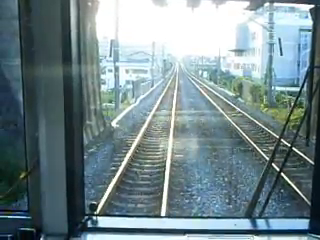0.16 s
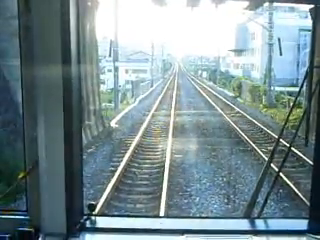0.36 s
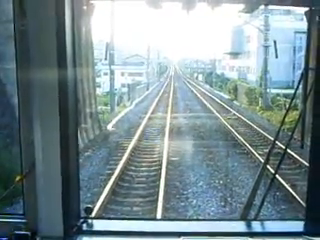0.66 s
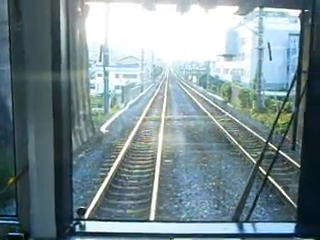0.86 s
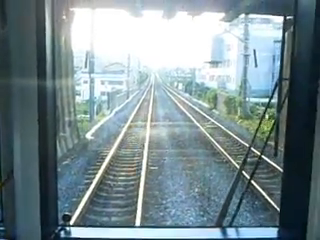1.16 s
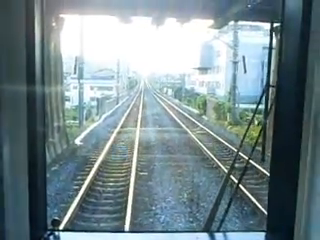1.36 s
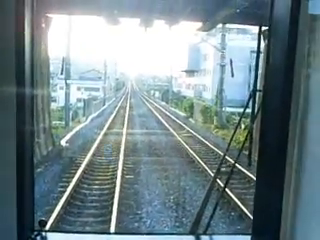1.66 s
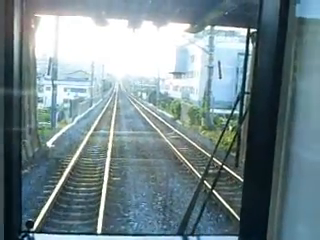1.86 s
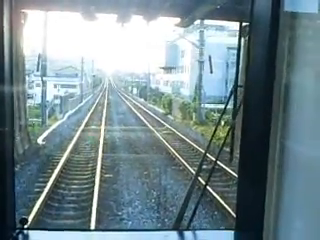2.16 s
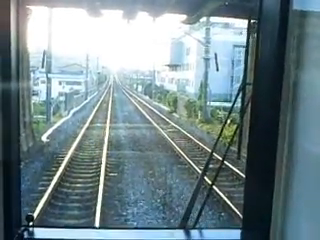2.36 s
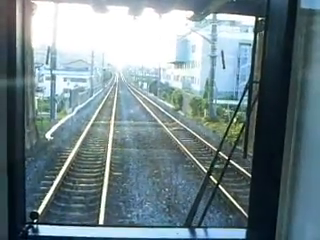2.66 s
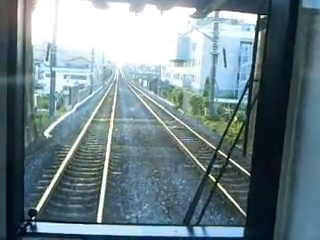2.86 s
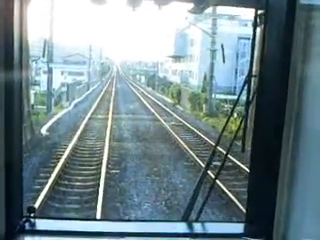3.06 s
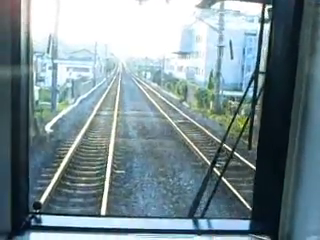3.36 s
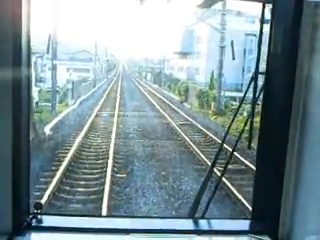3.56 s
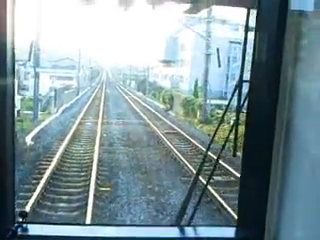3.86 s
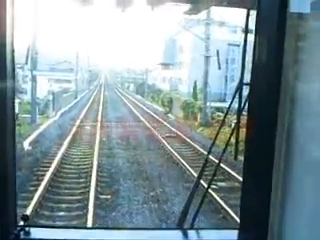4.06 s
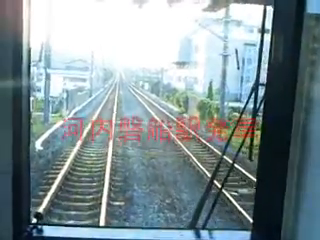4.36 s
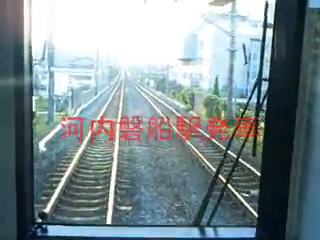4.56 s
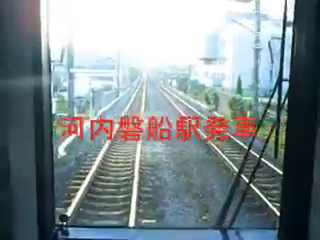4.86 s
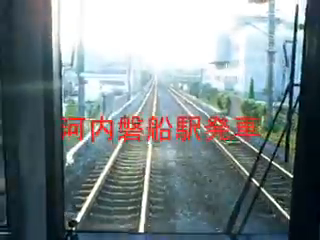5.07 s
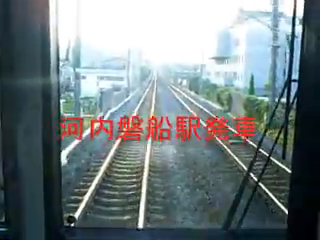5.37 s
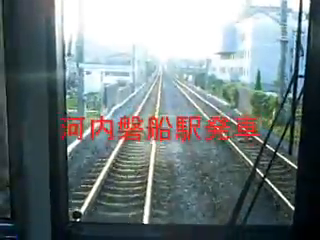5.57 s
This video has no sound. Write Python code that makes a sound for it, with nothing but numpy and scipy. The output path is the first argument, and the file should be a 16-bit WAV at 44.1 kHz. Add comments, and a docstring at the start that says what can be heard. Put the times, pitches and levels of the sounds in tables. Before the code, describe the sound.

Muffled low rumble and steady electrical hum inside a train cab, with an early knock and air puff, dull jolts and faint squeaks.

```python
"""In the cab of an electric train pulling away from a station, the car body rumbles and jolts over the track.
Shaped noise gives the rumble and the rush of the gears; struck modes give the jolts, and sines the electrical hum.
An air-driven switch knocks and puffs in bursts of noise as power comes on.
Wheels squeak faintly on unsteady notes and fittings rustle; a small camera crackles with overload at some jolts
and holds its samples, adding a thin fizz."""
import sys
import numpy as np
from scipy import signal
from scipy.fft import rfft, irfft, next_fast_len
from scipy.io import wavfile
from scipy.ndimage import uniform_filter1d, map_coordinates

SR = 44100
rng = np.random.default_rng(int(sys.argv[2]) if len(sys.argv) > 2 else 0)


def wav_out(sig):
    """Save sig, one row per channel (or a flat mono array), as 16-bit PCM at SR to the path in sys.argv[1]."""
    wavfile.write(sys.argv[1], SR, np.round(np.clip(np.atleast_2d(sig).T, -1, 1) * 32767).astype(np.int16))


N = 252693
TIME = np.arange(N) / SR
# the train accelerates evenly: speed as a share of the last speed
SPEED = TIME / TIME[-1]

# Noise spectra, only their shape counting: (frequency [Hz], relative density [dB per Hz])
# gears and bearings: dull rush and thin whirr
RUSH_SPECTRUM = [(400, -4.5), (600, -4), (750, -3), (880, -0.5), (1000, -4.5), (1300, -16.5)]
WHIRR_SPECTRUM = [(900, -12), (1200, -1.5), (1500, -3), (1750, -8), (2050, -14), (2700, -7), (3600, -19),
                  (5500, -13.5)]
# loose panels, duller and brighter
DULL_RUSTLE_SPECTRUM = [(700, -21.5), (1200, -12), (1600, 17), (2100, -8.5), (2700, -2.5), (5500, -35.5)]
BRIGHT_RUSTLE_SPECTRUM = [(1500, -18), (2300, -6.5), (2700, 1.5), (3500, -24.5), (5500, -37)]
# air switch: knock, puff of air and sharp top of the jet
KNOCK_SPECTRUM = [(30, 3), (70, 0), (105, 12.5), (190, 7.5), (260, 3), (450, -1.5), (800, -19), (1300, 10),
                  (1650, 0), (2100, -35), (2700, -18), (4000, -24), (5800, -19)]
PUFF_SPECTRUM = [(120, 8.5), (400, -4.5), (800, 0.5), (1500, 1), (2100, -12), (2650, 2), (3300, -18.5),
                 (4500, -12), (5800, -31)]
HISS_SPECTRUM = [(2200, -14.5), (2650, -12), (3300, 4), (3800, 1), (4600, 2.5), (5800, -4)]
# car: swaying body, shudder, drumming floor and rolling wheels
SWAY_SPECTRUM = [(10, -5.5), (16, 4.5), (29, 5.5), (38, 0.5), (44, -10.5)]
SHUDDER_SPECTRUM = [(40, -8), (46, -1), (49, -1), (54, 1), (64, -25.5)]
BOOM_SPECTRUM = [(58, -11), (68, -3), (80, 5.5), (95, -4.5), (110, -10), (140, -19)]
ROLL_SPECTRUM = [(105, -22), (135, 1.5), (170, 0), (210, -2), (270, -2.5), (350, -5.5), (410, -14.5),
                 (500, -19.5), (700, -23)]
# crackle of overload at a bump
CRACKLE_SPECTRUM = [(400, -0.5), (800, 7), (1080, 9.5), (1500, -13), (2200, -3.5), (3500, -8),
                    (5500, -10.5)]

# level of the thin whirr: (time [s], level [dB])
WHIRR_LEVEL = [(0, -39), (0.7, -44.5), (2.2, -44.5), (2.9, -46.5), (4.5, -47.5), (5.3, -46.5), (5.73, -44)]
# loose cab fittings: (time [s], level [dB], decay by 60 dB [s], brightness [0-1])
FITTING_RUSTLES = [(0.91, -42, 0.58, 0.22), (1.2, -37, 0.92, 0.58), (1.6, -44, 0.7, 0),
                   (2.56, -37.5, 0.56, 0.7), (2.65, -41, 0.4, 1), (3.185, -36.5, 0.5, 0.2),
                   (3.45, -43, 0.4, 0.5), (4.15, -31, 0.22, 0.42)]
# squeaks and groans of the wheels: (middle [s], length [s], frequency [Hz], rms level at the middle [dB])
WHEEL_SQUEAKS = [(0.033, 0.12, 1394, -46), (0.67, 0.13, 835, -40), (1.558, 0.42, 314.8, -39),
                 (1.88, 0.14, 1470, -48.5), (2.095, 0.34, 1423, -45.5), (2.468, 0.27, 1424, -47),
                 (3.91, 0.082, 660, -44), (4.312, 0.13, 368.4, -38), (4.967, 0.3, 1497, -51),
                 (5.31, 0.18, 1460, -46), (5.585, 0.08, 683, -40)]
# steady tones of the electrical gear: (frequency [Hz], central rms level [dB], waver [dB])
GEAR_TONES = [(121.05, -37, 0.5), (175.14, -40, 3.5), (235.2, -43.5, 1), (466.3, -54.5, 5),
              (546.9, -33.5, 0.63), (665.5, -54.5, 4), (1260, -61, 5.5), (1558, -62, 1)]
# drone of the traction motors: (time [s], frequency [Hz], central rms level [dB])
MOTOR_DRONE = [(0, 97, -46), (1.9, 98, -36.5), (2.3, 98.5, -33.5), (3.3, 98, -33.5), (3.8, 97.3, -29.5),
               (5.73, 98.17, -26.5)]
# lurches of the car: (time [s], hold [s], sway level [dB], shudder level [dB])
CAR_LURCHES = [(0.043, 0.15, -10, -17.5), (0.715, 0.22, -7, -11.5), (1.055, 0.11, -3.5, -17),
               (1.246, .2, -12.5, -14), (1.645, 0.38, -33, -13.5), (2.197, 0.14, -11, -30),
               (2.923, 0.17, -20, -22.5), (3.308, 0.54, -13.5, -26), (3.963, 0.21, -13, -37),
               (4.794, 0.072, -6.5, -22), (5.15, 0.34, -16.5, -28)]
# wheels rolling over rougher and smoother rail: (time [s], level [dB])
ROLL_LEVEL = [(0, -28.5), (.6, -31.5), (1.3, -31), (2.1, -33), (2.55, -34), (3.2, -33.5), (4.3, -32),
              (5.73, -30)]
# bumps: (time [s], strength before the mode's share [dB], hardness [Hz], overload crackle level [dB])
BUMPS = [(0.11, -23, 260, -60), (0.75, -18, 110, -50), (0.805, -11, 85, -14), (0.9, -14, 45, -36),
         (0.952, -15, 45, -28), (1.182, -12, 40, -21), (1.43, -23, 400, -50), (1.453, -20, 450, -33),
         (3.39, -14, 45, -60), (4.845, -21, 60, -60)]
# modes of the car body: (frequency [Hz], relative level [dB], decay by 60 dB [s])
BODY_MODES = [(34.8, -21, 0.53), (52.7, 2, 0.53), (80.4, 7, 0.19), (119, -11.5, 0.044), (260.4, -3.5, 0.14),
              (328.5, 4, 0.16), (420, -16, 0.083)]


def from_db(db):
    """Amplitude ratio of a level in decibels."""
    return 10 ** (np.asarray(db) / 20)


def rms_one(x):
    """Normalisation to unit effective value."""
    return x / np.sqrt(np.mean(x ** 2) + 1e-20)


def in_time(rows):
    """Linear interpolation of each column of a curve at every sample."""
    s, *columns = np.transpose(rows)
    return [np.interp(TIME, s, c) for c in columns]


def filtered(x, response):
    """Linear filtering by a gain over frequency; the ends are mirrored so that they stay smooth."""
    size = next_fast_len(N + SR // 2)
    lead = (size - N) // 2
    hz = np.arange(size // 2 + 1) * SR / size
    padded = np.pad(x, (lead, size - N - lead), mode="reflect")
    return irfft(rfft(padded) * response(hz), size)[lead:lead + N]


def noise(spectrum):
    """Spectral shaping of random noise to rms 1, falling steeply beyond the ends of the spectrum."""
    hz, db = np.transpose(spectrum)
    hz = np.r_[hz[0] / 2, hz, hz[-1] * 2]
    db = np.r_[db[0] - 20, db, db[-1] - 20]

    def response(f):
        # straight lines in dB over log frequency
        return from_db(np.interp(np.log(f + 1), np.log(hz), db)) * (f < hz[-1])

    return rms_one(filtered(rng.standard_normal(N), response))


def drift(rate_hz):
    """Random modulation of spread 1: noise under a Gaussian low-pass."""
    return rms_one(filtered(rng.standard_normal(N), lambda f: np.exp(-(f / rate_hz) ** 2)))


def evened(x, span_s):
    """Division by the running rms, taking the slow swells out of noise."""
    return x / np.sqrt(uniform_filter1d(x ** 2, max(int(span_s * SR), 2)) + 1e-9)


def burst(start, rise, t60):
    """Excitation and exponential decay: an envelope that rises quickly and dies away."""
    age = np.maximum(TIME - start, 0)
    return (1 - np.exp(-age / rise)) * from_db(-60 * age / t60)


def ring(clicks, hz, t60):
    """Damped resonance: a unit click sets a decaying sine of initial height 1 ringing."""
    r = np.exp(-np.log(1000) / (t60 * SR))
    w = 2 * np.pi * hz / SR
    return signal.lfilter([0, np.sin(w)], [1, -2 * r * np.cos(w), r * r], clicks + 1e-18)


def with_speed(start_db, rise_db):
    """Growth of running noise: the level in decibels moves with the square of the speed."""
    return from_db(start_db + rise_db * SPEED ** 2)


def lurches(attack_s=0.06, t60=0.65):
    """Transient excitation of sway and shudder: each lurch sets in, holds and dies away."""
    sway, shudder = 0, 0
    for s, hold, sway_db, shudder_db in CAR_LURCHES:
        age = np.maximum(TIME - s, 0)
        onset = 1 - np.exp(-age / attack_s)
        shape = onset * np.exp(-np.log(1000) * np.maximum(age - hold, 0) / t60)
        # overlapping lurches add in power
        sway = np.hypot(sway, from_db(sway_db) * shape)
        shudder = np.hypot(shudder, from_db(shudder_db) * shape)
    return sway, shudder


def running_gear(lurch_db=-33.0, flutter_db=1.0):
    """Broadband gear and bearing noise: a dull rush, louder in a lurch, under a thin, fluttering whirr."""
    swaying, _ = lurches()
    rush_gain = np.hypot(with_speed(-43, rise_db=1.5), from_db(lurch_db) * swaying)
    rush = rush_gain * noise(RUSH_SPECTRUM)
    whirr_db = in_time(WHIRR_LEVEL)[0] + flutter_db * drift(19)
    return rush + from_db(whirr_db) * noise(WHIRR_SPECTRUM)


def fittings(grain_db=1.5):
    """Friction between loose panels: they chafe in short grainy rustles, some duller, some brighter."""
    dull, bright = noise(DULL_RUSTLE_SPECTRUM), noise(BRIGHT_RUSTLE_SPECTRUM)
    out = 0
    for s, db, t60, brightness in FITTING_RUSTLES:
        rustle = (1 - brightness) * dull + brightness * bright
        out = out + from_db(db) * burst(s, rise=0.016, t60=t60) * rustle
    return out * from_db(grain_db * drift(70))


def squeaks(wander_hz=9.0, glide_hz=7.98, flutter_db=3.0):
    """Stick-slip friction: a rubbing wheel sings briefly on one unsteady, fluttering note."""
    # deviation in Hz, summed to a phase in cycles
    wander = np.cumsum(wander_hz * drift(80) + glide_hz * drift(8)) / SR
    out = 0
    for s, length, hz, db in WHEEL_SQUEAKS:
        swell = np.exp(-(2 * (TIME - s) / length) ** 2)
        out = out + from_db(db) * swell * np.sin(2 * np.pi * (hz * TIME + wander))
    return np.sqrt(2) * out * from_db(flutter_db * drift(35))


def hum(waver_rate_hz=3.8, drone_waver_db=1.0):
    """Periodic electrical excitation: fixed tones of the gear and the motors' drone growing with the load."""
    tones = 0
    for hz, db, waver_db in GEAR_TONES:
        gain = from_db(db + waver_db * drift(waver_rate_hz))
        tones = tones + gain * np.sin(2 * np.pi * (hz * TIME + rng.random()))
    hz, db = in_time(MOTOR_DRONE)
    drone_gain = from_db(db + drone_waver_db * drift(waver_rate_hz))
    drone = drone_gain * np.sin(2 * np.pi * np.cumsum(hz) / SR)
    return np.sqrt(2) * (tones + drone)  # from rms to peak


def air_switch(knock_db=-11.0, puff_db=-14.5, hiss_db=-20.0, sputter_db=1.0):
    """Impact and jet noise: a hard knock scattered by the panels, then the uneven puff of exhausting air."""
    knock_s, puff_s = 0.107, 0.11
    knock_noise = evened(noise(KNOCK_SPECTRUM), span_s=0.0077)
    knock = from_db(knock_db) * burst(knock_s, rise=0.0039, t60=0.36) * knock_noise
    puff = from_db(puff_db) * burst(puff_s, rise=0.038, t60=1.0) * noise(PUFF_SPECTRUM)
    # the sharp top of the jet fades first as the pressure falls
    hiss = from_db(hiss_db) * burst(puff_s, rise=0.059, t60=0.64) * noise(HISS_SPECTRUM)
    return knock + (puff + hiss) * from_db(sputter_db * drift(58))


def rumble(boom_shake_db=-10.5, roll_shake_db=-27):
    """Structure-borne noise: body sways and shudders, floor drums over rolling wheels; lurches swell all."""
    swaying, shaking = lurches()
    sway_gain = np.hypot(with_speed(-20, rise_db=3), swaying)
    shudder_gain = np.hypot(with_speed(-24, rise_db=4.5), shaking)
    # part of each shudder passes into the floor and the wheels
    boom_gain = np.hypot(with_speed(-32.5, rise_db=12), from_db(boom_shake_db) * shaking)
    roll_gain = np.hypot(from_db(in_time(ROLL_LEVEL)[0]), from_db(roll_shake_db) * shaking)
    sway = sway_gain * evened(noise(SWAY_SPECTRUM), span_s=0.087)
    shudder = shudder_gain * evened(noise(SHUDDER_SPECTRUM), span_s=0.11)
    boom = boom_gain * evened(noise(BOOM_SPECTRUM), span_s=0.12)
    roll = roll_gain * evened(noise(ROLL_SPECTRUM), span_s=0.36)
    return sway + shudder + boom + roll


def jolts(crackle_t60=0.019):
    """Modal response to impact: harder bumps ring higher modes, some overloading with a short crackle."""
    s, db, hardness_hz, crackle_db = np.transpose(BUMPS)
    crackle_gain = 0
    for at, level in zip(s, crackle_db):
        crackle_gain = crackle_gain + from_db(level) * burst(at, rise=0.00063, t60=crackle_t60)
    out = noise(CRACKLE_SPECTRUM) * crackle_gain
    for hz, mode_db, t60 in BODY_MODES:
        clicks = np.zeros(N)
        # a soft bump excites little above its hardness frequency
        clicks[np.round(s * SR).astype(int)] = from_db(db + mode_db) / (1 + (hz / hardness_hz) ** 2)
        out = out + ring(clicks, hz, t60)
    return out


def scene():
    """Superposition of all sources in one channel."""
    background = running_gear() + fittings() + squeaks() + hum()
    return (background + air_switch() + rumble() + jolts())[None]


def record(dry, leak_db=-27.5):
    """Averaging, saturation and sample-and-hold: the camera dulls, rounds off high peaks and holds samples."""
    first_null_hz, clock_hz, cutoff_hz = 1091, 12000, 15750
    # averaging over about a millisecond, with a little leaking past it
    dull = filtered(dry[0], lambda f: np.hypot(np.sinc(f / first_null_hz), from_db(leak_db)))
    rounded = dull / (1 + dull ** 8) ** (1 / 8)
    # the held steps mirror the rumble and hum around multiples of the slow clock
    hold_starts = np.floor(np.arange(N) * clock_hz / SR) * SR / clock_hz
    held = map_coordinates(rounded, [hold_starts], order=3, mode="nearest")
    # 6 ms fades at both ends
    from_end = np.minimum(TIME, TIME[-1] - TIME)
    fade = np.sin(np.pi / 2 * np.clip(from_end / 0.006, 0, 1)) ** 2
    low_pass = signal.ellip(12, 0.1, 90, cutoff_hz, fs=SR, output="sos")
    return signal.sosfilt(low_pass, held * fade)[None]


dry = scene()
out = record(dry)
wav_out(out)
```